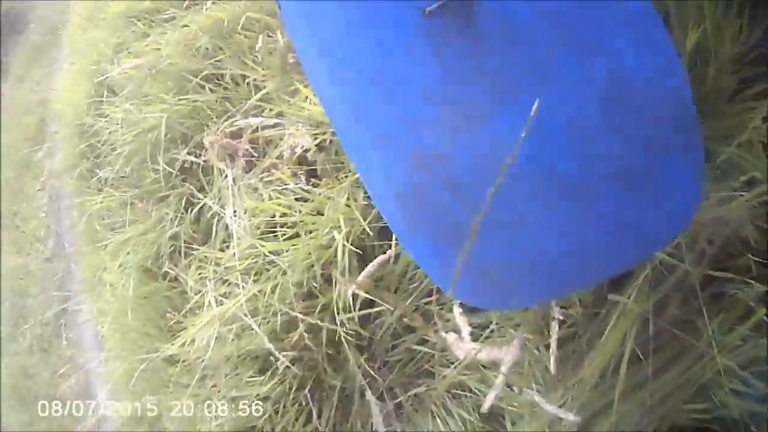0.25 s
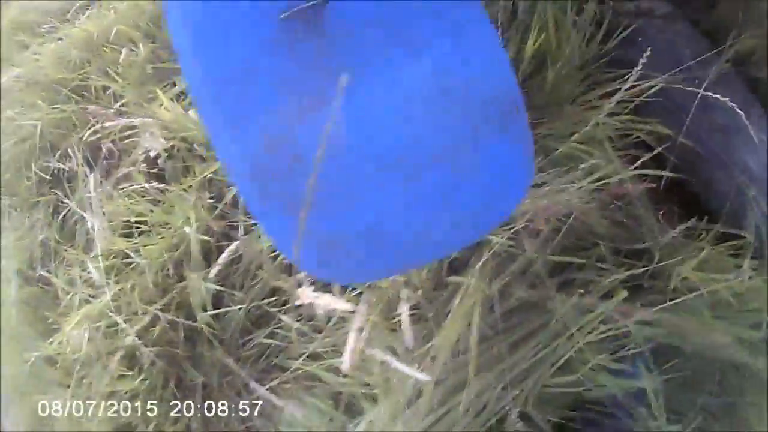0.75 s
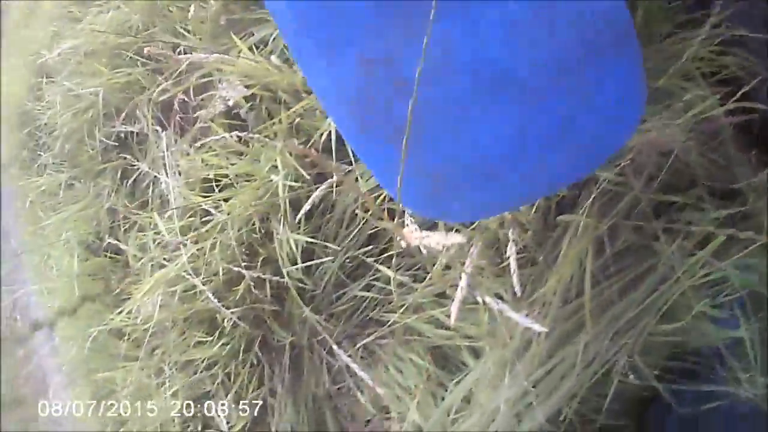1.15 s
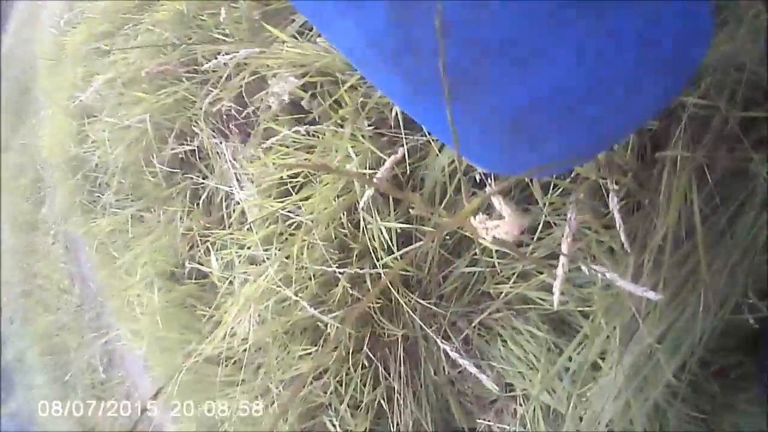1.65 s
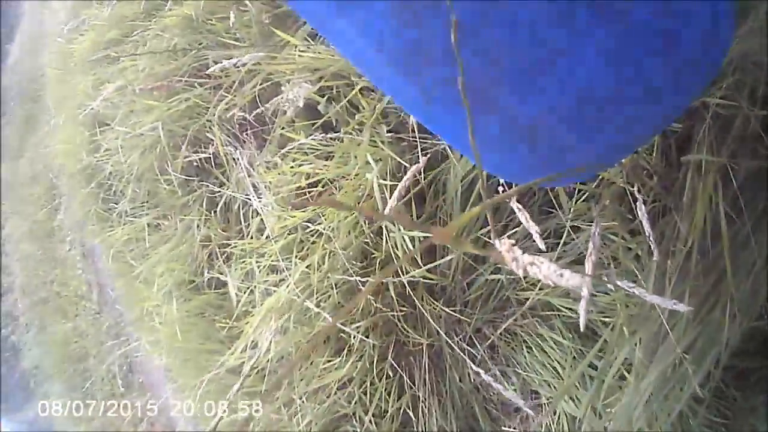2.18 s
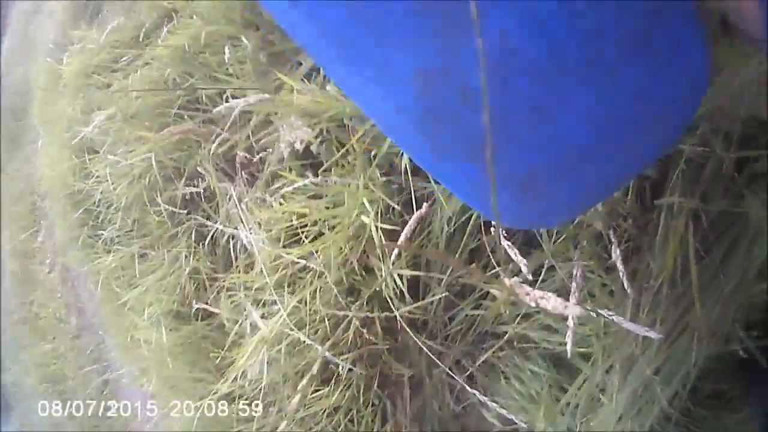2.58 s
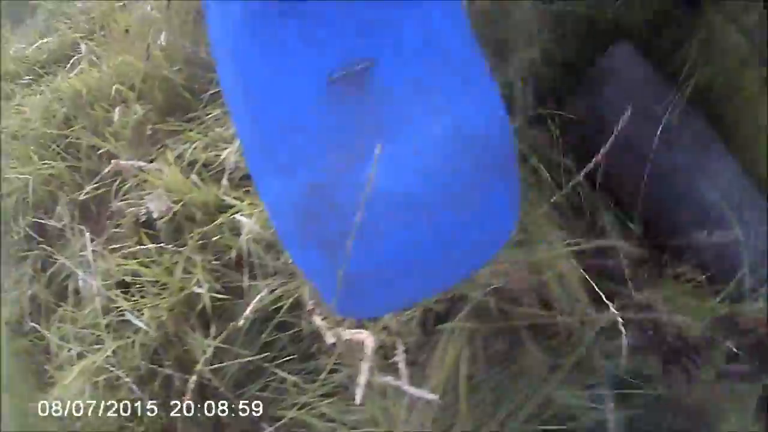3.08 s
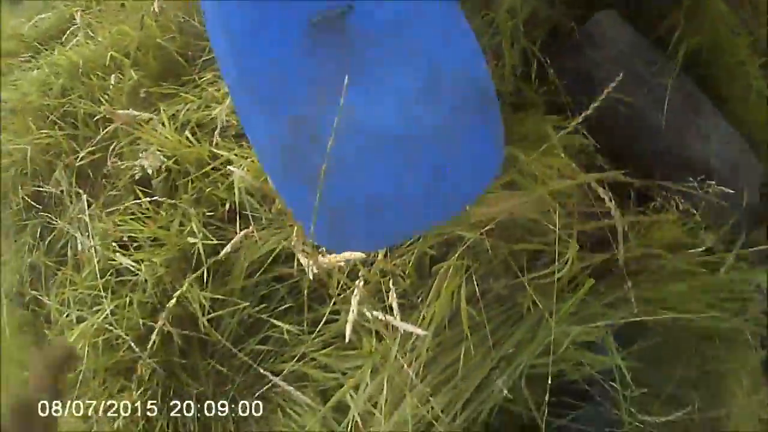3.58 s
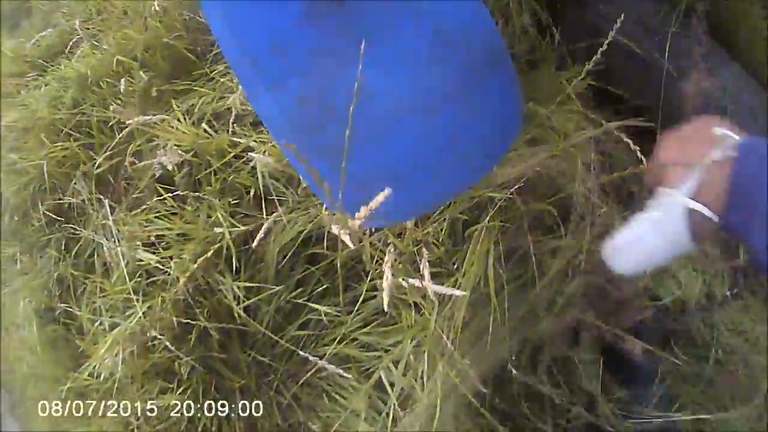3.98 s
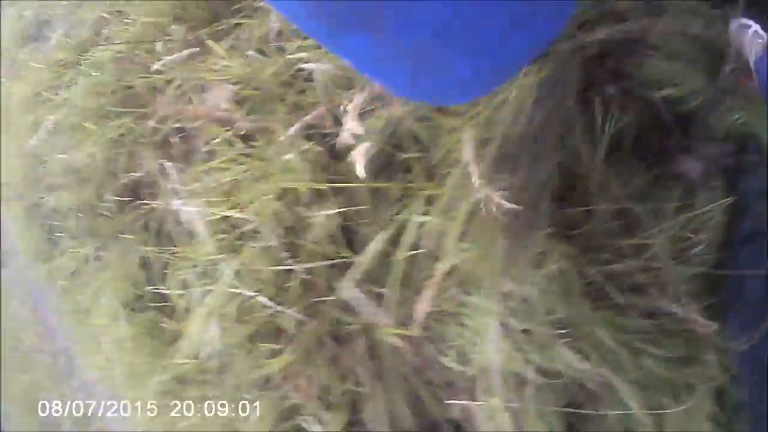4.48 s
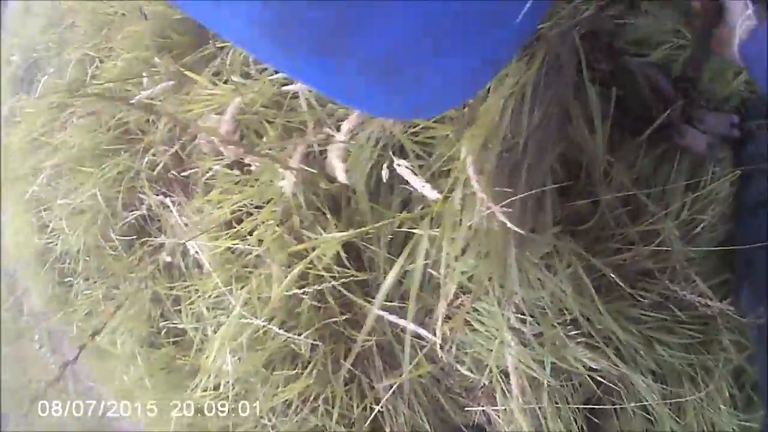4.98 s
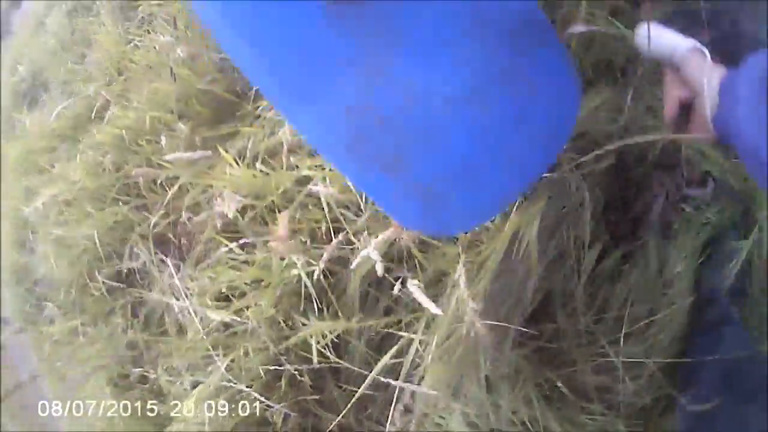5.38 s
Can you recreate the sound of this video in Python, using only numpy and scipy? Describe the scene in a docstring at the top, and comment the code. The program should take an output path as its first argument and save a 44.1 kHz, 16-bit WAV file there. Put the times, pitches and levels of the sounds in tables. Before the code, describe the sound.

Harness gear clinks and clicks against a metal cart in short bursts outdoors, over a faint steady rumble and hiss.

```python
"""Harness gear is handled beside a metal cart, close to a body-worn camera's microphone.
Chain links jingle and scrape, a steel ring pings, a hook knocks on the cart's shaft,
and fittings snap with a short rattle that leaves the frame ringing. The open field gives no echo.
Clothing rubs and bumps the camera; under it all lie a low rumble of air and the camera's hiss and whine."""
import sys
import numpy as np
from scipy import signal
from scipy.fft import rfft, irfft
from scipy.io import wavfile
from scipy.ndimage import uniform_filter1d

SR = 44100
rng = np.random.default_rng(int(sys.argv[2]) if len(sys.argv) > 2 else 0)


def generate_wav(sig):
    """Save sig (samples, or channels by samples) to the path in sys.argv[1] as 16-bit PCM at SR."""
    pcm = np.round(np.clip(np.atleast_2d(sig).T, -1, 1) * 32767).astype(np.int16)
    wavfile.write(sys.argv[1], SR, pcm)


N = 248634
RING_TIME = np.arange(SR // 2) / SR
FIRM_DB = -52.5  # a firm touch of the chain
# sway of the wearer, which moves air and cloth at the microphone: (time [s], level [dB])
SWAY = [(0.05, -59), (0.19, -59.5), (0.28, -54.5), (0.94, -56), (0.97, -59), (1.07, -55), (1.47, -55),
        (1.57, -52), (1.64, -60.5), (2.19, -55.5), (2.2, -63), (3.27, -56), (3.61, -58), (3.67, -54.5),
        (4.01, -62), (5.58, -58.5)]


def undb(db):
    """Decibels to gain."""
    return 10 ** (np.asarray(db) / 20)


def level(x, db):
    """Set the rms level."""
    return x * undb(db) / np.sqrt(np.mean(x ** 2))


def peak(x, db):
    """Set the level of the loudest three milliseconds."""
    return x * undb(db) / np.sqrt(uniform_filter1d(x ** 2, size=132).max())


def add(out, s, x):
    """Mix a sound in at time s."""
    i = int(s * SR)
    out[i:i + len(x)] += x[:N - i]


def curve(rows):
    """Join (time [s], value) rows by straight lines."""
    return np.interp(np.arange(N) / SR, *np.transpose(rows))


def onset(rise_s):
    """A contact takes a moment to build up."""
    return 1 - np.exp(-RING_TIME / rise_s)


def fade(t60):
    """Free decay by 60 dB in t60 seconds."""
    return np.exp(-np.log(1000) * RING_TIME / t60)


def mode(hz, t60):
    """One struck mode."""
    return np.sin(2 * np.pi * hz * RING_TIME) * fade(t60)


def band(hz, width):
    """Half a second of noise in a steep-sided resonance, rms 1."""
    size = len(RING_TIME)
    f = np.arange(size // 2 + 1) * SR / size
    phases = np.exp(2j * np.pi * rng.random(len(f)))
    return level(irfft(phases / (1 + 2 * ((f - hz) / width) ** 2), size), 0)


def colour(x, points):
    """Shape a sound by (frequency [Hz], level [dB]) points, rms 1."""
    hz, db = np.transpose(points)
    f = np.maximum(np.arange(N // 2 + 1) * SR / N, 1)
    gain = undb(np.interp(np.log(f), np.log(hz), db))
    return level(irfft(rfft(x) * gain, N), 0)


def wobble(size, smooth_s):
    """Random drift smoothed over smooth_s, rms 1."""
    return level(uniform_filter1d(rng.standard_normal(size), size=int(smooth_s * SR)), 0)


def air(gust_db=2.5, gust_s=.09):
    """Air rumbles on the microphone in small irregular puffs as the wearer sways."""
    # spectrum of the rumble: (frequency [Hz], level [dB])
    rumble = [(6, -26), (14, -5.5), (25, 5), (40, -1.5), (60, -8), (100, -15.5), (150, -48), (300, -56)]
    puffs = wobble(N, gust_s)
    return colour(rng.standard_normal(N), rumble) * undb(curve(SWAY) + gust_db * puffs)


def electronics(hiss_db=-60.5, wander_s=.01134):
    """The camera's own steady hiss, with thin whining tones of even strength and restless pitch."""
    # spectrum of the hiss: (frequency [Hz], level [dB])
    hiss = [(150, -7), (650, -10.5), (850, -7.5), (1120, 1), (1450, 0.5), (1900, -2), (2400, -13.5),
            (2780, -8.5), (3250, -17), (4200, -11), (4800, -15.5), (6800, -14.5), (7500, -17.5),
            (9300, -23), (11600, -19), (12500, -22.5), (15500, -29.5)]
    # tones of the electronics: (frequency [Hz], level [dB], pitch wander [Hz])
    whine = [(2827, -77, 16), (4257, -84, 40), (5693, -79, 7), (8483, -87, 10), (9895, -89, 20),
             (11385, -88, 6)]
    out = undb(hiss_db) * colour(rng.standard_normal(N), hiss)
    for hz, db, wander_hz in whine:
        pitch_hz = hz + wander_hz * wobble(N, wander_s)
        out += np.sqrt(2) * undb(db) * np.sin(2 * np.pi * np.cumsum(pitch_hz) / SR)
    return out


def clothing(cloth_db=-3, creep_db=-14, grains_per_s=900, attack_s=.019, release_s=.034):
    """Cloth rubs right at the microphone in dense soft grains, stroke by stroke."""
    # strokes of cloth as the wearer moves: (start [s], length [s], relative level [dB])
    strokes = [(.01, 0.03, -56), (0.303, 0.033, -54.5), (0.376, .2, -56.5), (0.603, 0.088, -62),
               (1.226, 0.15, -64), (1.417, 0.049, -60), (2.812, 0.047, -68), (3.09, 0.17, -64),
               (3.343, 0.045, -60), (3.462, 0.054, -61), (4.106, .22, -64), (5.127, .09, -64.5)]
    # spectrum of the rubbing: (frequency [Hz], level [dB])
    cloth = [(90, -54), (170, 5), (250, 4.5), (450, -4), (700, -11.5), (1300, -12.5), (3000, -34)]
    grains = rng.standard_normal(N) * (rng.random(N) < grains_per_s / SR)
    pressure = np.zeros(N)
    for s, length, db in strokes:
        release = np.exp(-np.maximum(RING_TIME - length, 0) / release_s)
        add(pressure, s, undb(db) * onset(attack_s) * release)
    creep = undb(curve(SWAY) + creep_db)  # cloth never quite rests
    return colour(grains, cloth) * np.hypot(pressure, creep) * undb(cloth_db)


def camera_bumps(scuff_db=-8, case_db=-14.5):
    """Clothing bumps the camera: a soft thud and a scuff that also ring its case."""
    # bumps on the camera: (time [s], peak [dB], pitch [Hz], t60 [s])
    bumps = [(0.3162, -45.5, 455, 0.02), (0.3414, -35, 128, 0.015), (.421, -44.5, 186, 0.032),
             (0.5178, -46, 306, 0.021), (.591, -55.5, 280, .053), (1.886, -56, 304, 0.033),
             (5.201, -46.5, 485, 0.034)]
    out = np.zeros(N)
    case = undb(case_db) * mode(hz=1120, t60=.022)
    for s, db, hz, t60 in bumps:
        scuff = undb(scuff_db) * band(hz, width=hz) * fade(t60)
        add(out, s, peak((mode(hz, t60) + scuff + case) * onset(.00055), db))
    return out


def chain_touches(stirs_per_s=24, scatter_db=.5, stir_hz=10230, lead_db=5, freedom=.54):
    """The moving chain makes clear touches and, as it stirs, faint ones at random."""
    # clear touches: (time [s], relative peak [dB], favoured mode [Hz], its lead [dB], freedom to ring [0-1])
    jingles = [(1.104, -62, 10230, 4, 0.6), (1.259, -51.5, 10230, 4, 1), (1.294, -46, 10230, 9, .7),
               (1.319, -43.5, 7957, 7, 1), (1.326, -61.5, 14230, 20, 1), (1.432, -46, 10890, 7, .9),
               (1.45, -43.5, 9880, 9, 0.54), (1.456, -54.5, 2990, 31, 1), (1.481, -53, 7957, 6, 0.94),
               (1.553, -59.5, 10100, 14, .4), (3.236, -46, 9560, 22, 0.5), (3.29, -51, 9560, 8, 0.5),
               (3.294, -61, 2990, 23, 0.9), (3.314, -56, 8570, 15, 0.7), (3.343, -43, 9990, 15, 0.4),
               (3.703, -62, 10230, 6, .2), (4.175, -61.5, 9050, 41, 0.2), (4.365, -62, 7957, 24, .06),
               (4.563, -52.5, 7957, 15, 0.6), (4.568, -52.5, 10610, 19, 1)]
    # spells of stirring: (start [s], length [s], relative peak [dB])
    stirs = [(0.996, .17, -65.5), (1.504, 0.046, -61.5), (1.576, .03, -68), (3.184, 0.053, -66),
             (3.778, .12, -66), (4.219, .1, -73)]
    touches = list(jingles)
    for start, length, db in stirs:
        count = max(round(length * stirs_per_s), 1)
        for k, (when, force) in enumerate(rng.random((count, 2))):
            s = start + length * (k + when) / count
            touches.append((s, db + scatter_db * (2 * force - 1), stir_hz, lead_db, freedom))
    return touches


def chain(touches, scatter_db=2, detune=.003, scrape_db=-20, count=6, chatter_s=.013, doubling_db=12):
    """Each touch is a quick run of soft sliding contacts between slightly unlike links, with a high scrape."""
    # modes of the links: (frequency [Hz], level [dB], t60 when free [s])
    link_modes = [(2990, -11, .09), (3110, -13, .07), (7273, -19, .24), (7957, -9, .18), (8570, -11, .18),
                  (9050, -22, .08), (9560, -11, .19), (9880, -4, .14), (10010, -3, .14), (10230, -3, .14),
                  (10610, -4, .14), (10760, -8, .1), (10890, -4, .13), (11080, -12, .09), (13510, -23, .16),
                  (14230, -21, .14), (15080, -27, .14)]
    out = np.zeros(N)
    soft = onset(.0009)
    for s, db, best_hz, lead_db, freedom in touches:
        span_s = chatter_s * 2 ** (min(db - FIRM_DB, 0) / doubling_db)  # light touches chatter less long
        nearest_hz = min((row[0] for row in link_modes), key=lambda hz: abs(hz - best_hz))
        clink = 0
        for hz, mode_db, t60 in link_modes:
            pitch, strength = rng.standard_normal(2)
            pinch_db = -8 * max(1 - freedom, 0) * (hz > 12000)  # tight links lose their top modes first
            gain = undb(mode_db + pinch_db + lead_db * (hz == nearest_hz) + scatter_db * strength)
            clink += gain * mode(hz * (1 + detune * pitch), t60 * freedom)
        contact_s = span_s * (np.arange(count) + rng.random(count)) / count
        contacts = np.zeros(len(RING_TIME))
        contacts[(contact_s * SR).astype(int)] = rng.uniform(.49, 1, count)
        jingle = peak(signal.fftconvolve(clink * soft, contacts)[:len(clink)], 0)
        scrape = (band(8900, width=1100) + band(4000, width=3200)) * fade(.034 + 3 * span_s) * soft
        add(out, s, peak(jingle + undb(scrape_db) * scrape, db))
    return out


def chain_scrape(touches, scrape_hz=(2750, 3550), ticks_per_s=1500, firm_db=-66, follow=.28, swell_s=.032):
    """Each touch of the chain has a short, dry, crackling scrape near 3 kHz that grows with its force."""
    ticks = rng.standard_normal(N) * (rng.random(N) < ticks_per_s / SR)
    crackle = level(signal.sosfilt(signal.butter(1, scrape_hz, "band", fs=SR, output="sos"), ticks), 0)
    power = np.zeros(N)
    for s, db, *_ in touches:
        add(power, s, undb(firm_db + follow * (db - FIRM_DB)) ** 2 * np.hanning(int(swell_s * SR)))
    return crackle * np.sqrt(power)


def steel_ring(flutter_db=2, flutter_s=.0053, spread_hz=8, rebound_s=.039, loss_db=8, rebound_t60=.14):
    """A ring slides on its hook and sings, fluttering as it rubs; at times it rebounds, ever weaker."""
    # strikes on the ring: (time [s], relative peak [dB], t60 [s], rebounds [count])
    pings = [(1.089, -58, .2, 0), (1.32, -45, 0.14, 0), (1.35, -47, .21, 0), (3.367, -62.5, 0.29, 0),
             (3.443, -52, 0.049, 0), (3.522, -43.5, 0.061, 2), (3.848, -54, 0.03, 1),
             (4.101, -54.5, 0.075, 1), (4.66, -69, .74, 0)]
    # modes of the ring, a beating pair and faint overtones: (frequency [Hz], level [dB])
    ring_modes = [(5938, 5.5), (5978, -3), (12250, -25), (13600, -21)]
    out = np.zeros(N)
    for s, db, first_t60, rebounds in pings:
        for k in range(round(rebounds) + 1):
            t60 = rebound_t60 if k else first_t60
            ping = sum(undb(mode_db) * mode(hz + spread_hz * rng.standard_normal(), t60)
                       for hz, mode_db in ring_modes)
            flutter = undb(flutter_db * wobble(len(ping), flutter_s))
            add(out, s + k * rebound_s, peak(ping * onset(.0067) * flutter, db - k * loss_db))
    return out


def favour(hz, centre_hz, width_hz):
    """How near a mode lies to the pitch that the point of contact picks out, 0-1."""
    return np.exp(-((hz - centre_hz) / width_hz) ** 2)


def fittings(damping=.29, strike_t60=.018, rattle_db=.5, rattle_samples=70, frame_db=-10):
    """A snap, then loose parts buzz in the metal's resonances; the treble dies first, the frame rings on."""
    # snaps: (time [s], level [dB], favoured resonance [Hz], its lead [dB], tilt [dB/octave],
    # t60 at 1 kHz [s], strike [0-1])
    snaps = [(1.241, -46, 3700, 7.5, 0, 0.5, 0.05), (1.2608, -50.5, 5300, 14, -3, 0.1, .5),
             (1.505, -54, 3300, 2.5, -1.5, 0.29, 0.13), (1.9589, -37, 8200, 9.5, -0.5, 0.2, 0.6),
             (1.985, -41.5, 3700, 3, -1.5, 0.24, 0.57), (3.7319, -45.5, 3700, 10.5, 0, 0.21, 0),
             (4.8699, -38, 2250, 3.5, -2, 0.28, 0.39)]
    # resonances of the fittings: (frequency [Hz], width [Hz], level [dB])
    resonances = [(417, 52, -12.5), (804, 290, -4.5), (1120, 81, -4), (1744, 490, 0), (2250, 74, -2.5),
                  (2840, 320, -11.5), (3300, 400, -2), (3700, 195, -2), (4320, 230, -12.5),
                  (5300, 930, -2.5), (6030, 110, -4.5), (6470, 440, -2), (8200, 370, -11.5),
                  (9600, 400, -18), (10700, 680, -7.5)]
    # modes of the cart's frame: (frequency [Hz], level [dB], t60 [s])
    frame_modes = [(422.5, 1, 0.44), (856.5, 9, 0.57), (867, -2, 0.28), (1170, -6, 0.21), (1920, -4, 0.18),
                   (2320, -4, .12)]
    frame = peak(sum(undb(db) * mode(hz, t60) for hz, db, t60 in frame_modes), frame_db)
    out, size = np.zeros(N), len(RING_TIME)
    for s, db, best_hz, lead_db, tilt_db, t60, strike in snaps:
        ringing = 0
        for hz, width, mode_db in resonances:
            gain = undb(mode_db + tilt_db * np.log2(hz / 2000) + lead_db * favour(hz, best_hz, 150))
            ringing += gain * band(hz, width) * fade(t60 * (1000 / hz) ** damping)
        jolts = undb(rattle_db * rng.standard_normal(size // rattle_samples + 1))
        rattle = uniform_filter1d(np.repeat(jolts, rattle_samples), rattle_samples // 2)[:size]
        buzz = peak(ringing * rattle * (1 + strike * fade(strike_t60)), 0)
        add(out, s, undb(db) * (buzz + strike * frame) * onset(.00041))
    return out


def hook(crack_t60=.033):
    """The hook's blows ring the cart's damped shaft, each with its own brightness; some begin with a crack."""
    # blows: (time [s], relative peak [dB], contact pitch [Hz], its boost or cut [dB],
    # treble tilt [dB/octave], crack [dB])
    knocks = [(1.2592, -36.5, 2250, 10, -8.5, -4), (1.284, -41.5, 1440, 8, -4, -27),
              (1.3083, -25, 1280, 3.5, -1.5, -19.5), (1.3199, -35.5, 3230, -12, 1, -5.5),
              (4.21, -44, 1130, 15, -10, -27), (4.839, -51.5, 1120, 11, -2, -32)]
    # modes of the shaft: (frequency [Hz], level [dB], t60 [s])
    shaft_modes = [(790, -7.5, 0.061), (1149, 0, 0.061), (1363, 1.5, 0.04), (1440, -12, 0.11),
                   (1488, -3.5, 0.029), (1774, -13, 0.1), (1820, -5, 0.027), (2110, -11, 0.043),
                   (2205, -1.5, 0.039), (2740, -30, 0.042), (2930, -10, 0.03), (3243, -9, 0.054),
                   (3580, -15, 0.025), (3820, -22, 0.077), (4300, -20, 0.058)]
    low_cut = signal.butter(3, 650, "high", fs=SR, output="sos")  # a thin shaft radiates little bass
    out = np.zeros(N)
    for s, db, contact_hz, boost_db, tilt_db, crack_db in knocks:
        body = 0
        for hz, mode_db, t60 in shaft_modes:
            treble_db = tilt_db * max(np.log2(hz / 1150), 0)
            gain = undb(mode_db + treble_db + boost_db * favour(hz, contact_hz, 120))
            polarity = 1 if hz < 1650 else rng.choice([-1, 1])  # the low modes start in step
            body += gain * polarity * mode(hz, t60)
        crack = band(2200, width=4200) * fade(crack_t60)
        blow = (peak(body, 0) + peak(crack, crack_db)) * onset(.00053)
        add(out, s, peak(signal.sosfilt(low_cut, blow), db))
    return out


def scene(chain_db=-2, ring_db=-2, hook_db=-1):
    """One microphone in the open field, with every source close and dry."""
    touches = chain_touches()
    gear = undb(chain_db) * chain(touches) + undb(ring_db) * steel_ring()
    gear += undb(hook_db) * hook() + fittings()
    return (gear + chain_scrape(touches) + clothing() + camera_bumps() + air() + electronics())[None]


def record(dry, top_hz=15600, offset=-.042):
    """The camera cuts the top, and its converter rests a little below zero."""
    return signal.sosfilt(signal.ellip(8, .2, 70, top_hz, fs=SR, output="sos"), dry) + offset


dry = scene()
out = record(dry)
generate_wav(out)
```